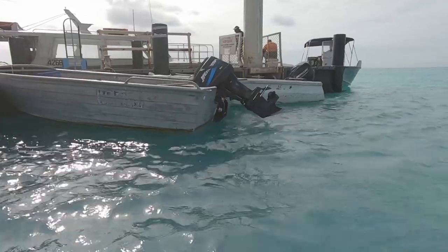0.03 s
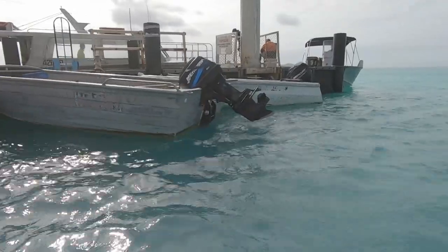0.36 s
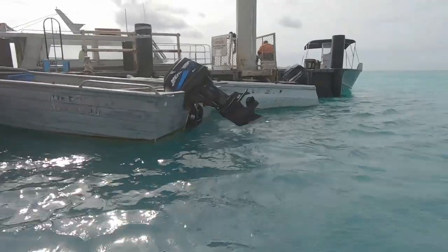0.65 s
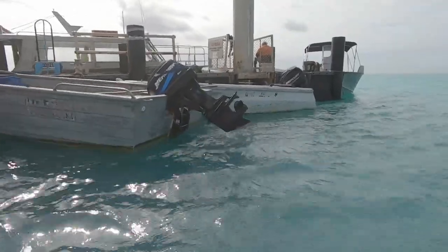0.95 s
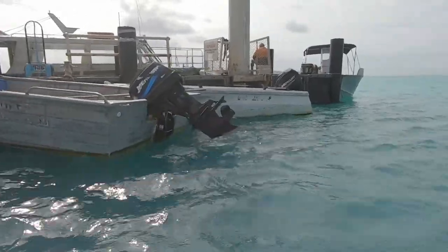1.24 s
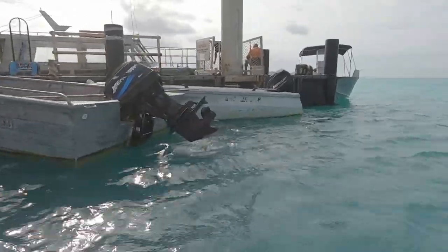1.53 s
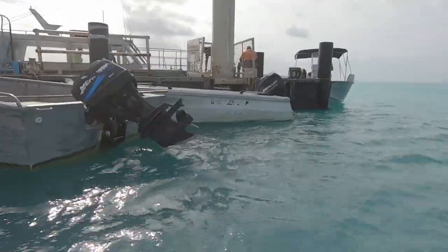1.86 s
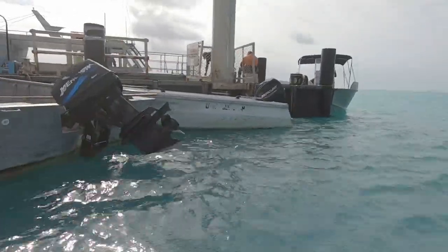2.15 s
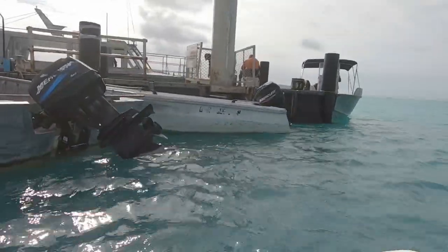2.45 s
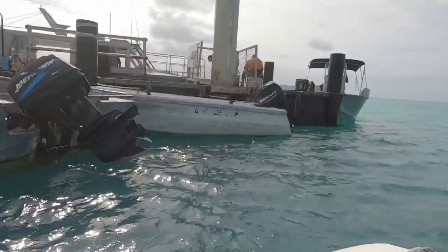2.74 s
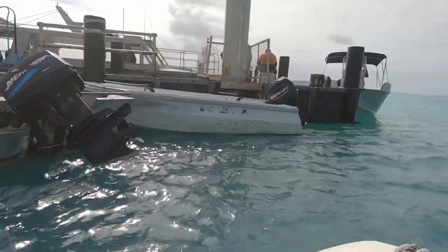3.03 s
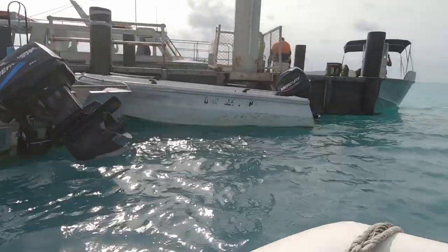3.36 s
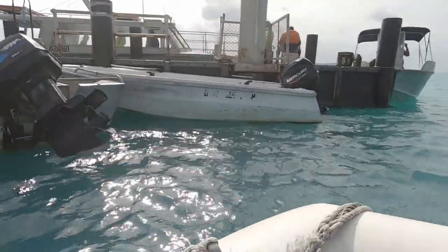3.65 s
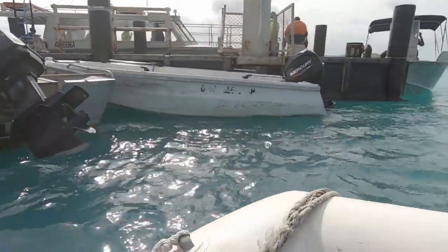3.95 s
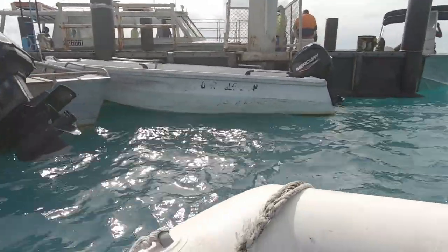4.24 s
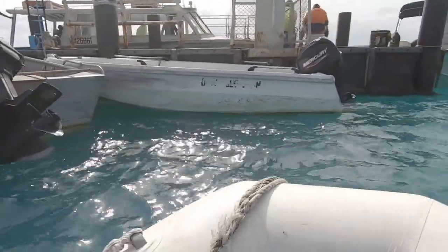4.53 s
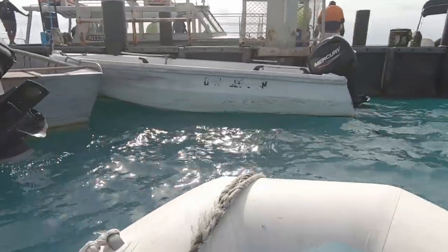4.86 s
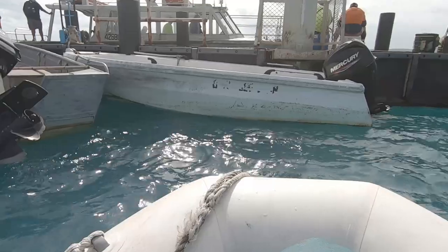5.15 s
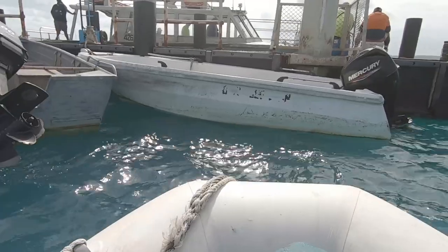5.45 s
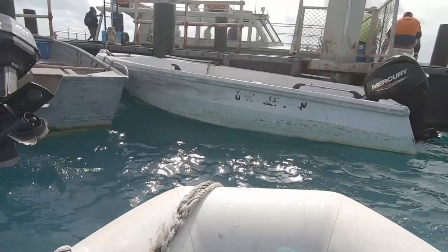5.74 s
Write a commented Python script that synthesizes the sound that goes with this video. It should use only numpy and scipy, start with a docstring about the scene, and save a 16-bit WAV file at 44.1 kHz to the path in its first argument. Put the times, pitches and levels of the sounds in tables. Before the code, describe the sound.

A small outboard motor idles with a steady, rapid putter and a splashy clatter as an inflatable boat creeps toward a jetty. Wind buffets the microphone for about the first second. Then choppy water slaps, splashes and gurgles along the hull, close by, over a low rumble of breeze. Near the end the underwater exhaust burbles louder and the slaps get harder.

```python
"""On the water near a jetty, an inflatable boat creeps in, its outboard idling at 22 firings a second.
The firings drive the resonances of the motor's housing; once a turn the exhaust burbles out under water,
louder near the end. Wind buffets the microphone at first; then chop slaps and gurgles along the hull,
its trapped air ringing as bubbles. Beneath lie a low rumble of breeze and hull and a splashy clatter
from the outboard at the stern."""
import sys
import numpy as np
from scipy import signal
from scipy.fft import rfft, irfft, next_fast_len
from scipy.io import wavfile
from scipy.ndimage import uniform_filter1d, map_coordinates

SR = 44100
rng = np.random.default_rng(int(sys.argv[2]) if len(sys.argv) > 2 else 0)


def dump_mix(stems):
    """Bounce the given channels to the path in sys.argv[1] as a 16-bit WAV at rate SR."""
    frames = np.atleast_2d(stems).T  # one column per channel
    limited = np.clip(frames, -1, 1)  # hard clip at full scale
    pcm = np.round(limited * 32767).astype(np.int16)
    wavfile.write(sys.argv[1], SR, pcm)


N = 255780
TIME = np.arange(N) / SR

# splashy clatter from the outboard; rumble of light breeze and hull: time_s, level_db
CLATTER_LEVEL = [(0, -39), (0.25, -43.5), (0.43, -47.5), (0.54, -43.5), (0.6, -44), (0.68, -42.5),
                 (0.95, -42), (1.15, -49), (1.33, -43), (1.41, -48), (1.5, -41.5), (1.59, -46), (1.7, -46)]
RUMBLE_LEVEL = [(1.4, -33.5), (1.62, -35.5), (1.76, -28.5), (1.9, -37.5), (2.8, -28.5), (3.7, -34.5),
                (4.0, -27.5), (4.8, -35), (5.1, -30), (5.45, -41), (5.8, -27)]
# roughness of the water along the hull; deep sloshing under the tubes: time_s, level_db
CHOP_LEVEL = [(1.5, -51), (2.0, -42.5), (2.7, -35.5), (3.15, -39), (3.6, -37.5), (4.25, -37), (5.15, -37),
              (5.5, -34.5), (5.8, -34.5)]
SLOSH_LEVEL = [(1.5, -61), (2.15, -49), (2.37, -43), (2.79, -39.5), (3.2, -45.5), (3.68, -40), (4.54, -41),
               (5.02, -49), (5.52, -36), (5.8, -42)]
# spectral envelopes of the noisy sources: frequency_hz, gain_db
CLATTER_SPECTRUM = [(250, 3), (450, 1), (690, 8.5), (810, -7), (980, -4), (1200, -4), (1500, -3.5),
                    (2100, -9), (2900, -9.5), (4500, -15.5), (7500, -22.5), (9500, -36.5), (14000, -56.5)]
RUMBLE_SPECTRUM = [(8, -40), (20, 4.5), (35, 3), (60, 4.5), (100, -2.5), (160, -8), (230, -11.5),
                   (320, -39), (800, -64)]
WIND_SPECTRUM = [(8, -40), (18, -38.5), (35, 5.5), (55, 4.5), (88, -3.5), (137, -17), (200, -30),
                 (400, -45), (900, -100.5)]
CHURN_SPECTRUM = [(300, -6), (550, 2), (750, 4.5), (1000, -3), (1350, -5), (2000, -7.5), (2800, -10.5),
                  (4500, -16.5), (7500, -32.5), (10000, -49), (14000, -63)]
SPRAY_SPECTRUM = [(1500, -15), (4000, -6), (6000, -2), (8000, -6), (10400, -9.5), (14000, -19)]
SLOSH_SPECTRUM = [(120, 0), (220, -2.5), (290, -5), (360, 1), (490, 8.5), (640, -1), (900, -11),
                  (1400, -8.5), (4000, -54)]
GURGLE_SPECTRUM = [(750, -3.5), (1400, -12), (2300, -14.0)]
# gusts on the microphone: start_s, length_s, level_db
WIND_GUSTS = [(0.03, 0.13, -20.5), (0.212, 0.029, -20), (0.355, 0.046, -20.5), (0.44, 0.044, -34),
              (0.654, 0.055, -29), (0.768, 0.024, -19.5), (0.893, 0.081, -21.5), (1.014, 0.098, -18.5),
              (1.175, 0.032, -26), (3.995, 0.048, -31)]
# waves meeting the hull: start_s, length_s, churn_db, spray_db
HULL_WAVES = [(1.626, 0.035, -41.5, -79), (1.7, 0.1, -45, -76), (2.112, 0.046, -43.5, -55),
              (2.266, 0.028, -38.5, -54.5), (2.348, 0.047, -49, -50.5), (2.6, .04, -51, -59),
              (2.768, 0.06, -41.5, -59), (3.339, 0.039, -34, -53), (3.401, 0.072, -36.5, -64),
              (3.608, .04, -45.5, -58), (3.817, 0.13, -46, -75.5), (3.988, 0.14, -43.5, -62),
              (4.298, 0.06, -41, -57), (4.448, 0.032, -53, -56), (4.675, 0.042, -40.5, -55),
              (4.91, 0.084, -48, -56.5), (5.343, 0.051, -38.5, -70), (5.425, 0.042, -37, -56),
              (5.615, 0.026, -38, -48)]
# spray falling back on the water: start_s, level_db, pitch_hz
SPRAY_DROPS = [(1.4724, -65, 6980), (1.6514, -57, 6250), (2.1414, -52, 7480), (2.829, -53, 7000),
               (2.8888, -55, 6920), (2.968, -43, 8350), (3.0734, -54, 7230), (3.1822, -57, 6290),
               (3.5947, -49, 8330), (3.6594, -52, 6660), (3.8876, -53, 8480), (4.0544, -54, 6830),
               (4.2884, -53, 6000), (4.3151, -51, 6590), (4.4645, -38, 8400), (4.775, -41, 7990),
               (4.9364, -50, 7110), (4.9586, -48, 7540), (5.03, -41, 6750)]
# wavelets slapping the hull: start_s, level_db, centre_hz, length_s
HULL_SLAPS = [(0.475, -40, 1820, 0.023), (0.535, -37.5, 1570, 0.017), (0.642, -35, 1620, 0.025),
              (0.777, -34, 3180, 0.017), (0.815, -26, 1840, 0.007), (1.3, -27, 1850, 0.0058),
              (1.469, -34, 2780, 0.0058), (1.512, -33, 2650, 0.0042), (1.643, -32, 1350, .007),
              (1.647, -35, 4150, 0.011), (1.735, -28.5, 1210, 0.0059), (1.781, -31, 1250, .012),
              (2, -32, 1080, 0.025), (2.12, -29, 2030, 0.0087), (2.205, -27.5, 1760, 0.0086),
              (2.264, -25.5, 2300, 0.014), (2.331, -29.5, 3430, 0.01), (2.35, -25.5, 1014, 0.013),
              (2.394, -29.5, 3020, 0.0044), (2.464, -31.5, 1700, .004), (2.49, -43, 2000, 0.0043),
              (2.54, -31.5, 2900, .004), (2.589, -25.5, 2600, 0.0055), (2.695, -31.5, 3420, .006),
              (2.743, -27, 1760, 0.0057), (2.774, -28.5, 2110, 0.0035), (2.817, -22, 1780, 0.0065),
              (2.826, -29.5, 3650, .005), (2.945, -27, 1670, 0.0036), (2.993, -24.5, 1070, 0.0049),
              (3.18, -35, 4600, 0.0054), (3.339, -28, 2820, 0.012), (3.357, -24.5, 2200, 0.0098),
              (3.364, -39, 6140, .005), (3.408, -25, 930, 0.007), (3.431, -22, 2400, 0.0042),
              (3.506, -32, 2760, 0.0026), (3.62, -33, 3170, 0.022), (3.65, -31, 4530, 0.0083),
              (3.686, -34, 4270, 0.0028), (3.91, -29.5, 2930, 0.01), (4.107, -25.5, 1400, 0.015),
              (4.243, -37, 3600, 0.0028), (4.309, -26.5, 2050, 0.0093), (4.694, -22.5, 860, 0.018),
              (4.716, -33, 1080, .022), (4.897, -31, 2500, 0.03), (4.962, -36, 3800, .006),
              (5.078, -28, 1780, 0.011), (5.17, -33, 1590, 0.015), (5.338, -23.5, 1390, 0.022),
              (5.416, -23, 1060, 0.009), (5.455, -22.5, 1980, 0.0023), (5.541, -23.5, 1240, 0.0026),
              (5.625, -17, 1370, 0.0076), (5.626, -31, 3700, 0.014), (5.761, -25, 1100, 0.0047)]
# water hitting the tubes flat: start_s, level_db, centre_hz
TUBE_SMACKS = [(1.6467, -35, 1480), (2.265, -26, 2000), (2.326, -30, 3300), (2.590, -30, 2700),
               (2.626, -25, 2960), (3.365, -30, 1500), (4.120, -25.5, 3000), (5.577, -24, 1710),
               (5.602, -29, 3000), (5.618, -17, 1280), (5.624, -18.5, 1500), (5.774, -25, 2980)]
# single bubbles, from deep gulps to bright plinks: start_s, level_db, pitch_hz, decay_s, rise_per_decay
AIR_POCKETS = [(0.818, -31, 1310, 0.0043, 0.02), (1.303, -29.5, 1255, 0.0065, .02),
               (1.628, -35.5, 777, 0.0083, .04), (2.024, -34, 1440, 0.0046, .03),
               (2.355, -24.5, 865, 0.0054, 0.029), (2.826, -24.5, 930, 0.0063, 0.036),
               (2.938, -16.5, 385, 0.0095, -0.0032), (3.091, -25.5, 429, 0.019, 0.051),
               (3.3, -28, 817, .012, .02), (3.408, -17.5, 343, 0.015, 0.051), (3.414, -22, 200, 0.01, .04),
               (3.414, -29, 887, .007, 0.027), (3.538, -23, 245, 0.013, .04),
               (3.622, -21, 390, 0.01, 0.036), (3.835, -27, 290, 0.012, .04),
               (3.865, -19.5, 356, 0.012, 0.028), (3.889, -22, 467, 0.0084, .04),
               (3.902, -24, 196, 0.0078, 0.054), (4.261, -22, 230, 0.0099, 0.046),
               (4.273, -35.5, 1264, .01, -0.0093), (4.34, -27, 336, .01, 0.033),
               (4.541, -22.5, 675, 0.0074, 0.021), (4.7, -26, 934, 0.012, 0.044),
               (4.704, -20.5, 401, 0.015, 0.042), (4.775, -17.5, 183, 0.015, 0.077),
               (5.175, -19.5, 500, 0.0071, 0.028), (5.38, -21, 336, 0.016, 0.024),
               (5.405, -19, 277, 0.014, 0.0021), (5.428, -23, 633, .007, 0.029),
               (5.4575, -22.5, 2050, 0.0025, 0.044), (5.627, -26, 2830, 0.0044, -0.03),
               (5.634, -25, 2450, 0.0085, 0.00022), (5.776, -14.5, 1004, 0.0023, 0.047)]
# strength of the exhaust and of the firing knocks: time_s, level_db
EXHAUST_LEVEL = [(1.4, -52), (2.2, -47), (3.3, -42.5), (3.9, -36), (4.8, -36.5), (5.28, -38.5), (5.43, -27),
                 (5.56, -26.5), (5.8, -19.5)]
KNOCK_LEVEL = [(0, -40), (0.32, -40), (0.5, -51.5), (0.65, -38), (0.95, -40), (1.17, -52), (1.55, -38.5),
               (2.6, -30.5), (3.5, -31), (3.9, -32), (4.5, -36), (5.4, -29), (5.8, -34)]
# resonances of the underwater boom and of the motor's housing: centre_hz, pole_width_hz, gain_db
BOOM_MODES = [(181.6, 114, 3), (276.4, 150, -8.5), (119.3, 130, -8.5)]
HOUSING_MODES = [(594.5, 111, 2.5), (669, 370, -13), (1560, 500, -30.5)]
# motor speed: time_s, firings_per_s
FIRING_RATE = [(0.0, 22.68), (0.3, 22.06), (0.6, 21.66), (1.2, 21.68), (1.6, 22.49), (2.1, 22.08),
               (2.5, 21.75), (2.9, 22.03), (3.9, 22.15), (4.3, 21.82), (5.0, 21.98), (5.35, 22.41),
               (5.8, 22.01)]
# blows within one turn of the two cylinders: place_turns, level_db
CYLINDER_BLOWS = [(.11, -9), (.25, -4), (.485, 3), (.63, -8), (.975, 0)]
# part of the housing's ring smeared into a steady wash: time_s, power_share
RING_BLUR = [(3.3, 0), (4.3, .12), (5.2, .25)]
# response of the microphone in its waterproof case: frequency_hz, gain_db
CASE_RESPONSE = [(4000, -0.5), (5100, 0), (5800, -7), (7500, -0.5), (9000, -5), (10500, -5.5), (11700, -16),
                 (14000, -17)]


def amp(db):
    """Amplitude ratio: tenfold for every 20 decibels."""
    return 10 ** (np.asarray(db) / 20)


def unit_rms(x):
    """Normalisation to unit mean power."""
    return x / np.sqrt(np.mean(x ** 2) + 1e-20)


def follow(rows):
    """Linear interpolation of (time_s, value) rows at every sample."""
    return np.interp(TIME, *np.transpose(rows))


def colour(x, spectrum):
    """Spectral shaping by (frequency_hz, gain_db) points on a logarithmic frequency axis."""
    size = next_fast_len(len(x) + 4096)
    hz, db = np.transpose(spectrum)
    gain = amp(np.interp(np.log(np.fft.rfftfreq(size, 1 / SR) + 1), np.log(hz), db))
    return irfft(rfft(x, size) * gain, size)[:len(x)]


def resonate(x, hz, pole_width_hz, order=4):
    """Cascaded resonance, steady or moving: equal poles in a row make a blow swell and fade."""
    carrier = np.exp(2j * np.pi * np.cumsum(hz * np.ones(len(x))) / SR)
    pole = np.exp(-np.pi * pole_width_hz / SR)
    baseband = x / carrier
    for _ in range(order):
        baseband = signal.lfilter([1 - pole], [1, -pole], baseband + 1e-18)
    return 2 * (baseband * carrier).real


def drift(per_s):
    """Random modulation: a smooth curve of rms 1 through per_s random values a second."""
    knots = rng.standard_normal(N // 20)
    return unit_rms(map_coordinates(knots, [TIME * per_s], order=2, mode="mirror"))


def steadied(x, window_s):
    """Division by the running rms removes swells slower than the window."""
    size = int(window_s * SR)
    power = uniform_filter1d(uniform_filter1d(x ** 2, size), size)
    return x / np.sqrt(abs(power) + 1e-12)


def swell(start_s, length_s, attack_s=0.0079, release_s=0.014):
    """Envelope with a linear attack and, once its length has passed, an exponential decay."""
    age = TIME - start_s
    return np.clip(age / attack_s, 0, 1) * np.exp(-np.maximum(age - length_s, 0) / release_s)


def add(mix, start_s, sound):
    """Superposition of a sound on the mix at a given time."""
    part = mix[max(round(start_s * SR), 0):][:len(sound)]
    part += sound[:len(part)]


def bubble(hz, decay_s, rise):
    """Damped oscillation of an air pocket; nearing the surface, it glides by the share rise per decay."""
    age = np.arange(int(6 * decay_s * SR) + 2) / (decay_s * SR)  # in decay times
    onset = (1 - np.exp(-10 * age)) ** 2
    return np.sin(2 * np.pi * hz * decay_s * (age + rise * age ** 2 / 2)) * np.exp(-age) * onset


def bubbles(low_hz, high_hz, per_s, spread_db, cycles, count):
    """Shot noise: bubbles of count sizes, born at random times, sum to an even spectrum."""
    swarm = np.zeros(N)
    for hz in np.geomspace(low_hz, high_hz, count):
        when, chance, sign = rng.random((int(per_s * N / SR / count), 3)).T
        strength = amp(-spread_db * np.log(chance + 0.01))  # positive spread: few loud, many faint
        births = np.bincount((when * N).astype(int), strength * np.sign(sign - .5), N)
        ringing = signal.oaconvolve(births, bubble(hz, cycles / hz, rise=0.0066))[:N]
        swarm += np.sqrt(hz) * unit_rms(ringing)
    return unit_rms(swarm)


def rumble(level_db=-3.5):
    """Low-frequency noise: the rumble of light breeze on the microphone and of the hull."""
    low_noise = steadied(colour(rng.standard_normal(N), RUMBLE_SPECTRUM), 0.08)
    return amp(follow(RUMBLE_LEVEL) + level_db) * low_noise


def stern_clatter(level_db=-3.0, patchy_db=1.5):
    """Modulated noise: splashy clatter from the outboard, at first rising and falling with the motor."""
    drips = bubbles(1100, 6000, per_s=2500, spread_db=2.6, cycles=8, count=24)
    clatter = steadied(colour(drips + rng.standard_normal(N), CLATTER_SPECTRUM), 0.05)
    return amp(follow(CLATTER_LEVEL) + level_db + patchy_db * drift(22.15)) * clatter


def wind(level_db=1, breeze_db=-34, shelter_s=(1.28, 1.42)):
    """Turbulent pressure on the microphone: gusts over a breeze that dies as the boat finds shelter."""
    eddies = steadied(colour(rng.standard_normal(N), WIND_SPECTRUM), 0.025)
    gusts = sum(amp(db) * swell(start_s, length_s, attack_s=0.029, release_s=0.024)
                for start_s, length_s, db in WIND_GUSTS)
    breeze = amp(breeze_db) * np.interp(TIME, shelter_s, [1, 0])
    return amp(level_db) * np.hypot(breeze, gusts) * eddies


def water_gains(churn_db=-5, spray_db=-65, slosh_db=4.0, usual_chop_db=-38.5, slosh_lag_s=0.04):
    """Incoherent sources add in power: each wave lifts the gains of churn, spray and, later, slosh."""
    chop_db = follow(CHOP_LEVEL)
    churn = amp(chop_db + churn_db)
    spray = amp(spray_db + 1.53 * (chop_db - usual_chop_db))  # spray grows faster than churn
    slosh = amp(follow(SLOSH_LEVEL) + slosh_db)
    for start_s, length_s, wave_db, splash_db in HULL_WAVES:
        wave = swell(start_s, length_s)
        churn = np.hypot(churn, amp(wave_db) * wave)
        spray = np.hypot(spray, amp(splash_db) * wave)
        slosh = np.hypot(slosh, amp(wave_db - 2) * swell(start_s + slosh_lag_s, length_s))
    return churn, spray, slosh


def sprinkle(level_db=-6):
    """Sparse shot noise: fine droplets tick separately wherever there is spray."""
    ticks = bubbles(4000, 9000, per_s=110, spread_db=3.0, cycles=5, count=16)
    _, spray_gain, _ = water_gains()
    return amp(level_db) * spray_gain * ticks


def drops(level_db=6, cycles=3.5):
    """Air entrainment: each falling drop traps a tiny bubble that pings once."""
    pings = np.zeros(N)
    for start_s, db, hz in SPRAY_DROPS:
        add(pings, start_s, amp(db + level_db) * bubble(hz, cycles / hz, rise=.03))
    return pings


def gurgle(level_db=-14):
    """Free oscillation of middle-sized bubbles, which warble briefly in the chop."""
    swarm = bubbles(750, 2300, per_s=140, spread_db=1.8, cycles=8, count=24)
    return amp(follow(CHOP_LEVEL) + level_db) * unit_rms(colour(swarm, GURGLE_SPECTRUM))


def chop(surge_db=1.5, flurry_db=1.9, arrival_s=(1.26, 1.48)):
    """Bubble pitch falls with size: along the hull, spray hisses, churn bubbles and slosh sounds low."""
    surge = amp(surge_db * drift(40))
    drips = .7 * bubbles(800, 11000, per_s=800, spread_db=3.5, cycles=12, count=48)
    churn = bubbles(578, 10200, per_s=5000, spread_db=2.0, cycles=1.43, count=20)
    churn += drips + rng.standard_normal(N)  # long-ringing drips over a smooth wash
    spray = bubbles(3350, 12000, per_s=1100, spread_db=-2.5, cycles=0.33, count=10)
    spray += 0.35 * drips + rng.standard_normal(N)
    slosh = bubbles(184.0, 1300, per_s=900, spread_db=-0.5, cycles=2.06, count=14)
    flurry = amp(flurry_db * drift(24))
    churn_gain, spray_gain, slosh_gain = water_gains()
    arrival = np.interp(TIME, arrival_s, [0, 1])
    return arrival * (surge * churn_gain * steadied(colour(churn, CHURN_SPECTRUM), 0.051)
                      + surge * flurry * spray_gain * steadied(colour(spray, SPRAY_SPECTRUM), 0.072)
                      + slosh_gain * steadied(colour(slosh, SLOSH_SPECTRUM), 0.61))


def slaps(level_db=-2, scatter=.55, cycles=2.8, ring_spread=.3, foam=.45, count=50):
    """Air entrainment by breaking wavelets: each makes a shower of small bubbles and a hiss of foam."""
    splashes = np.zeros(N)
    for start_s, db, hz, length_s in HULL_SLAPS:
        age = np.arange(SR // 4) / SR / length_s
        hiss = colour(rng.standard_normal(len(age)), [(hz / 4, -30), (hz, 0), (hz * 8, -40)])
        hiss = unit_rms(hiss * (1 - np.exp(-2 * age)) * np.exp(-.7 * age))
        shower = np.zeros(len(age))
        waits = rng.gamma(2, .5, count)  # in slap lengths
        for wait, pitch, size, ring in zip(waits, *rng.standard_normal((3, count))):
            ring_hz = hz * np.exp(scatter * np.tanh(pitch))
            decay_s = cycles * np.exp(ring_spread * ring) / ring_hz
            add(shower, wait * length_s, size * np.exp(-wait / 4) * bubble(ring_hz, decay_s, rise=0.025))
        splash = unit_rms(shower) + foam * hiss
        add(splashes, start_s, amp(db + level_db) * splash / abs(splash).max())
    return splashes


def smacks(level_db=0, cycles=1.2, spit=.5, spit_s=.0012):
    """Heavily damped impact: water hits a tube flat, with an abrupt knock and a spit of spray."""
    impacts = np.zeros(N)
    age_s = np.arange(SR // 40) / SR
    for start_s, db, hz in TUBE_SMACKS:
        knock = bubble(hz, cycles / hz, rise=0)
        knock = np.pad(knock, (0, len(age_s)))[:len(age_s)]
        spectrum = [(hz / 4, -20), (hz, 0), (hz * 2, -6), (hz * 6, -40)]
        spray = colour(rng.standard_normal(len(age_s)), spectrum) * np.exp(-age_s / spit_s)
        smack = unit_rms(knock) + spit * unit_rms(spray)
        add(impacts, start_s, amp(db + level_db) * smack / abs(smack).max())
    return impacts


def gulps(level_db=0, scatter=0.443, piece_gain=.26, burble_decays=2.2, count=8):
    """Bubble break-up: large air pockets close under the hull, ring once and burble into other sizes."""
    burble = np.zeros(N)
    for start_s, db, hz, decay_s, rise in AIR_POCKETS:
        gain = amp(db + level_db)
        add(burble, start_s, gain * bubble(hz, decay_s, rise))
        for wait, pitch, size in rng.uniform([0, -.6, -1.5], [2, 1, 1.5], (count, 3)):
            piece = bubble(hz * np.exp(scatter * pitch), decay_s / 2, rise)
            add(burble, start_s + wait * burble_decays * decay_s, gain * piece_gain * size * piece)
    return burble


def crank():
    """Phase as the integral of rate: turns of the crankshaft, two firings each."""
    return np.cumsum(follow(FIRING_RATE)) / SR / 2 + .225


def strokes(turns, place, uneven_db):
    """Impulse train: one impulse a turn, at the given place, each of random strength."""
    passed = np.diff(np.floor(turns - place), prepend=np.floor(turns[0] - place)) > 0
    return passed * amp(uneven_db * rng.standard_normal(N))


def exhaust(turns, level_db=-2, puff_db=2.5, puff_turns=.22, lead_turns=.17, froth_gain=.55):
    """Pulsed resonance: gas let go once a turn thumps under the stern, then swells into a hollow froth."""
    puff = unit_rms(amp(puff_db * np.cos(2 * np.pi * (turns - puff_turns))))
    releases = strokes(turns, puff_turns - lead_turns, uneven_db=2.2)
    thump = unit_rms(resonate(releases, BOOM_MODES[0][0], pole_width_hz=60))
    froth = sum(amp(db) * resonate(rng.standard_normal(N), hz, width) for hz, width, db in BOOM_MODES)
    boom = thump + froth_gain * puff * steadied(froth, 0.046)
    return amp(follow(EXHAUST_LEVEL) + level_db) * steadied(boom, 0.13)


def motor(turns, level_db=-4.0, wander=0.014, rattle_s=.005, rattle_gain=.8):
    """Forced vibration: knocks and rattles ring the housing, whose modes waver and blur near the jetty."""
    blows = sum(amp(db) * strokes(turns, place, uneven_db=2.1) for place, db in CYLINDER_BLOWS)
    rattle_power = signal.lfilter([1], [1, -np.exp(-2 / (rattle_s * SR))], blows ** 2)
    rattle = np.sqrt(rattle_power) * rng.standard_normal(N)
    knocks = unit_rms(unit_rms(blows) + rattle_gain * unit_rms(rattle))
    blur = follow(RING_BLUR)
    drive = np.sqrt(1 - blur) * knocks + np.sqrt(blur) * rng.standard_normal(N)
    bend = 1 + wander * drift(18)
    ring = sum(amp(db) * resonate(drive, hz * bend, width) for hz, width, db in HOUSING_MODES)
    return amp(follow(KNOCK_LEVEL) + level_db) * steadied(ring, 0.086)


def scene():
    """Superposition of water, motor and wind at one microphone."""
    turns = crank()
    splashing = stern_clatter() + chop() + gurgle() + sprinkle() + slaps() + smacks() + gulps() + drops()
    return (motor(turns) + exhaust(turns) + rumble() + wind() + splashing)[None]


def record(dry):
    """Linear filtering: the waterproof case colours the treble, and a low-pass ends the band at 14 kHz."""
    cased = colour(dry[0], CASE_RESPONSE)
    low_pass = signal.firwin(511, 14000, window=("kaiser", 9), fs=SR)
    return signal.oaconvolve(cased, low_pass, "same")[None]


dry = scene()
out = record(dry)
dump_mix(out)
```